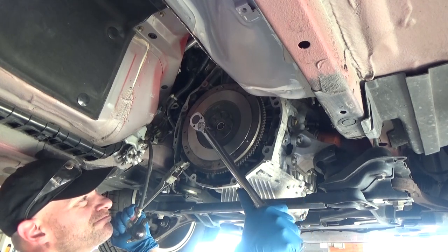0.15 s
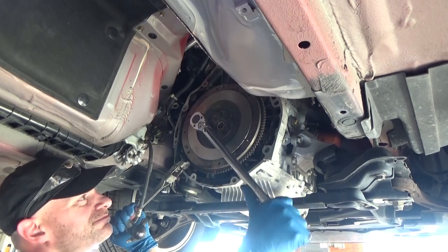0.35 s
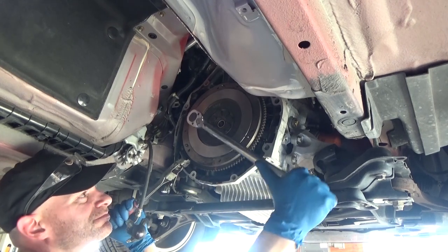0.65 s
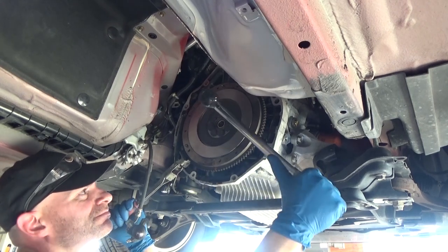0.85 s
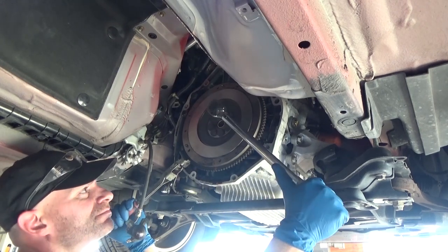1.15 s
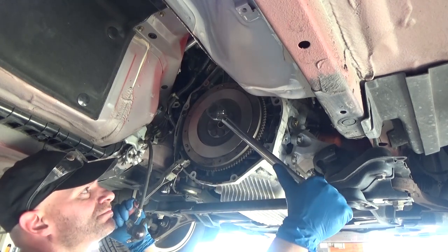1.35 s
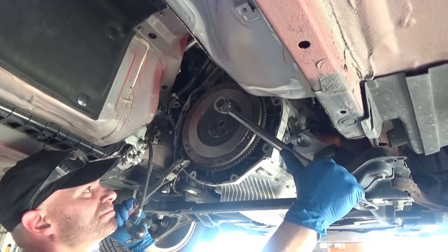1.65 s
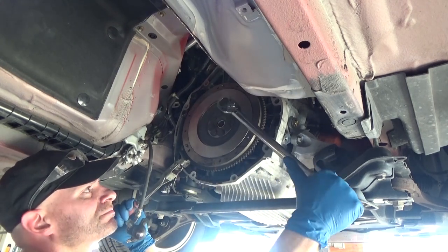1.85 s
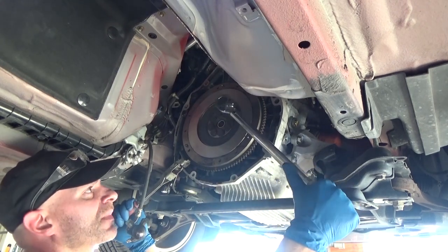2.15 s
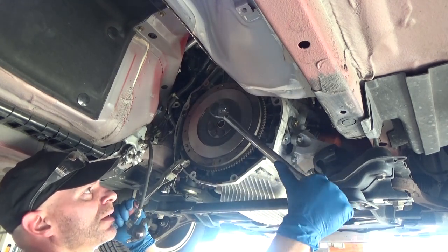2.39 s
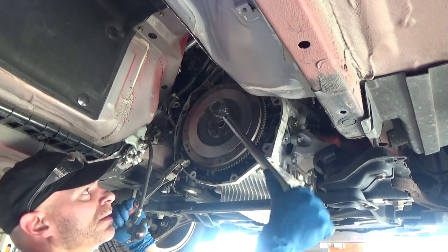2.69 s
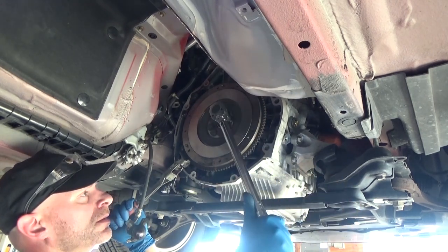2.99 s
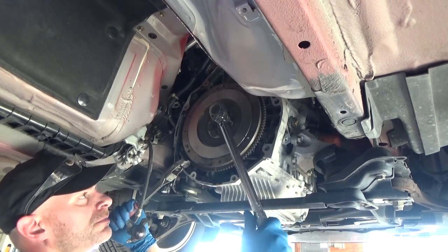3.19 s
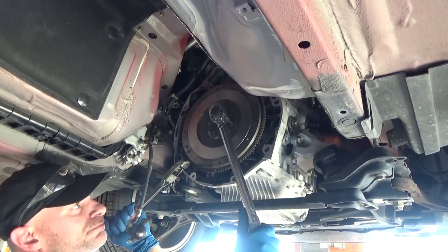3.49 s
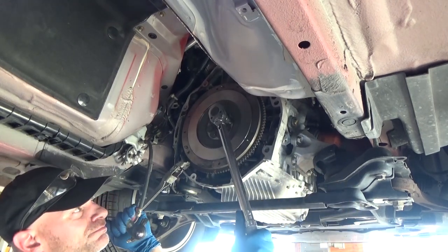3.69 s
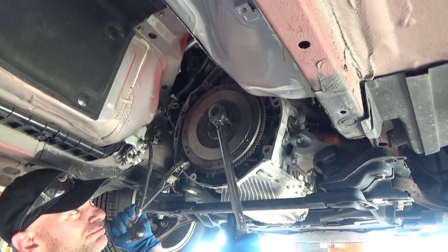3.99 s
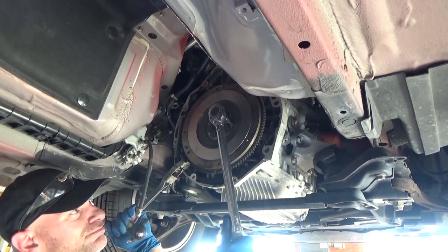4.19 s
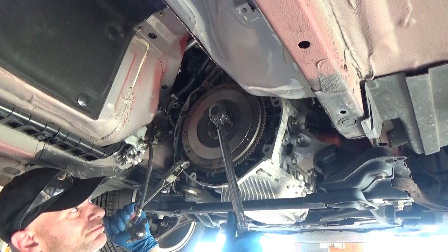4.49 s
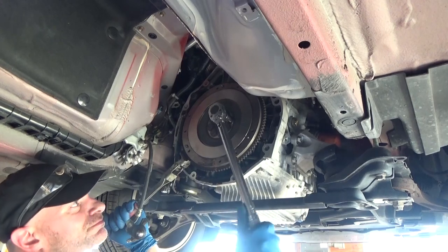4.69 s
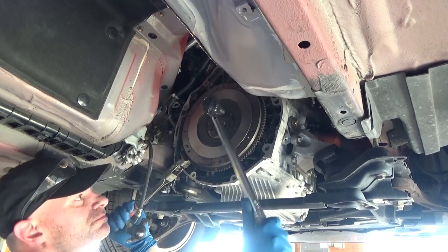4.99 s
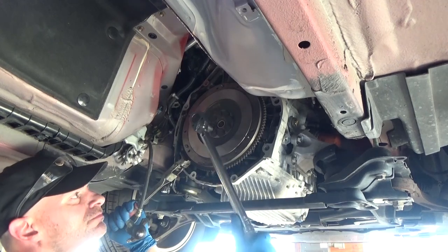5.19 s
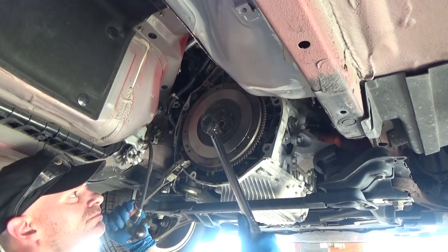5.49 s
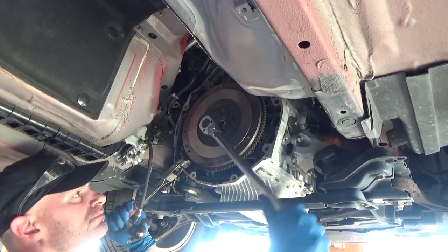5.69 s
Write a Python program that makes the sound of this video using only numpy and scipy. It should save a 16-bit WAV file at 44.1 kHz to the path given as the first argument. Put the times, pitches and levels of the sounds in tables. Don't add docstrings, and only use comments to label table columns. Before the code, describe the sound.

Two hard ratchet-like clicks open the scene, followed by light clinks, short scrapes and metallic knocks as a socket moves between bolts. A lull with only low engine hum and hiss leads to another click and snap, then a softer seating and a drop. The microphone is near, in a reverberant garage, its background dipping briefly at loud blows.

```python
import sys
import numpy as np
from scipy import signal
from scipy.fft import rfft, irfft, next_fast_len
from scipy.io import wavfile

SR = 44100
rng = np.random.default_rng(int(sys.argv[2]) if len(sys.argv) > 2 else 0)


def transcribe(u):
    v = np.clip(np.atleast_2d(u).T, -1, 1)
    q = np.round(v * 32767).astype(np.int16)
    wavfile.write(sys.argv[1], SR, q)


def voltage_ratio(decibels):
    exponent = np.asarray(decibels, float) / 20
    return 10 ** exponent


N = 257984

# [t/s, crack peak level/dB, tail against crack/dB, late share of tail/dB,
# flywheel ring against crack/dB]
PAWL_BREAKS = [
    (0.159, -11, -13, 3, -38),
    (4.2192, -12.5, -8.5, 0.5, -34),
]
PAWL_RETURNS = [
    (0.4005, -10.5, -12, -4, -34),
    (4.4744, -13, -9, -6, -32),
]
SOCKET_SLAPS = [
    (1.134, -14, -8, -1.2, -10),
]
SOCKET_SEATS = [
    (1.743, -12.5, -8, -2.5, -15),
    (5.4321, -17.5, -8, -7.5, -19),
]
SOCKET_KNOCKS = [
    (2.4117, -11.5, -16.5, 0.5, -16.5),
    (2.5291, -19.5, -13.5, -29, -39),
    (2.7846, -12, -15, -1.5, -28),
]
SOCKET_DROPS = [
    (5.676, -12.5, -3, -13, -28),
]
# [f/Hz, width/Hz, level/dB]
KNOCK_COLOUR = [(120, -55), (200, -26), (659, -14.5), (791, 3), (1020, -9.5), (4600, -8.5), (5230, -8.5),
                (5840, -9.5), (6640, -15.5), (12200, -9), (16000, -29)], [(782, 31, 1.5), (2440, 470, -4.5),
                (2800, 60, -9.5), (4600, 150, -1.5), (8750, 87, 0.5), (10790, 140, 0.5), (12300, 100, -17)]
# [f/Hz, level/dB, time to fall 60 dB/s]
SEAT_NOTES = [(810, -1, 0.5), (890, -23, 0.97), (1715, 1, 0.18), (4640, -8, .33), (9394, -2, .4),
              (11010, -2, .3), (11340, -12, .4), (12290, -2, .17), (13100, -13, .27), (13310, -9, 0.33),
              (14020, -16, .3)]
# [f/Hz, side against middle/dB]
RING_WIDTH = [(60, -29), (110, -18), (200, -19), (380, -12), (700, -8), (1290, -7.5), (2380, -8.5),
              (4400, -10.5), (8120, -9), (15000, -23)]


def unit(x):
    return x / np.sqrt(np.mean(x ** 2) + 1e-20)


def along(points, hz):
    f, v = np.transpose(points)
    return np.interp(np.log(hz + 1), np.log(f + 1), v)


def curves(rows):
    s, *columns = np.transpose(rows)
    return [np.interp(np.arange(N) / SR, s, column) for column in columns]


def bump(hz, centre_hz, octaves):
    return np.exp(-.5 * (np.log2((hz + 1) / centre_hz) / octaves) ** 2)


def noise(size, gain, spread):
    fast = next_fast_len(size)
    hz = np.fft.rfftfreq(fast, 1 / SR)
    widths = [hz * 0 + 1, voltage_ratio(along(spread, hz))]
    spectra = rfft(rng.standard_normal((2, fast))) * gain(hz) * widths
    mid, side = irfft(spectra, fast)[:, :size]
    return unit(np.array([mid + side, mid - side]))


def add(out, s, x):
    out[:, round(s * SR):][:, :x.shape[1]] += x


def colour(tone, valley_db, body_db=0):
    broad, peaks = tone
    top_db = max(peak[2] for peak in peaks)

    def gain(hz):
        power = voltage_ratio(2 * (along(broad, hz) + valley_db))
        for centre_hz, width_hz, db in peaks:
            power = power + voltage_ratio(2 * (db - top_db)) / (1 + (2 * (hz - centre_hz) / width_hz) ** 2)
        return np.sqrt(power) * voltage_ratio(body_db * bump(hz, 673, 0.24)) * (hz > 150)

    return gain


def crack(gain, t60):
    t = np.arange(SR // 10) / SR
    return noise(len(t), gain, [(1000, -11), (12000, -22)]) * voltage_ratio(-60 * t / t60) * (1 - np.exp(-t / 0.00033))


def ringing(gain, size, early_t60, late_db):
    # [f/Hz, time to fall 60 dB/s]
    late_t60 = [(300, 2.0), (800, 1.1), (2000, 1.25), (5500, 1.15), (10000, 0.72), (15000, 0.55)]
    hz, t, z = signal.stft(noise(size, gain, RING_WIDTH), SR, nperseg=128)
    early = voltage_ratio(-60 * t / early_t60)
    late = voltage_ratio(late_db - 60 * t / along(late_t60, hz)[:, None])
    sound = signal.istft(z * (early + late), SR, nperseg=128)[1][:, :size]
    return sound * (1 - np.exp(-np.arange(size) / SR / 0.0048))


def modal(modes, t):
    rise_cycles, blur_rad, blur_hz = 1.7, 0.48, 25
    out = 0
    for hz, db, t60 in modes:
        fade = voltage_ratio(db + rng.normal(0, 2.3) - 60 * t / t60) * (1 - np.exp(-t * hz / rise_cycles))
        drift = blur_rad * noise(len(t), lambda f: 1 / (1 + (f / blur_hz) ** 2), [(100, -19)])
        out = out + fade * np.sin(2 * np.pi * hz * t + drift)
    return out


def flywheel(t):
    ring_hz, first_silence_s, weaker_share, t60 = 5711, .115, .8, 0.39
    second_hz = ring_hz + .5 / first_silence_s
    pair = np.sin(2 * np.pi * ring_hz * t) + weaker_share * np.sin(2 * np.pi * second_hz * t)
    return (pair * voltage_ratio(-60 * t / t60) * (1 - np.exp(-(t / 0.0093) ** 2)))[None]


def blows(table, tone, modes, valley_db, modes_db, crack_t60, early_t60, body_db=-0.1):
    out, t = np.zeros((2, N + 2 * SR)), np.arange(65536) / SR
    body = colour(tone, valley_db, body_db)
    bright = lambda hz: body(hz) * voltage_ratio(18.5 * bump(hz, 17800, 1.84))
    for s, db, tail_db, late_db, ring_db in table:
        add(out, s - .001, voltage_ratio(db) * crack(bright, crack_t60))
        add(out, s - .001, voltage_ratio(db + tail_db) * ringing(body, len(t), early_t60, late_db))
        add(out, s, voltage_ratio(db + tail_db + modes_db) * modal(modes, t[:32768]))
        add(out, s, voltage_ratio(db + ring_db + 3.5) * flywheel(t))
    return out[:, :N]


def ticks(table, tone, tail_db, broad, modes_db, note_db):
    # [f/Hz, level/dB, time to fall 60 dB/s]
    socket_notes = [(4700, -8, 0.023), (5710, -7.5, 0.013), (9500, 2, 0.007), (11000, 2.5, 0.0042),
                    (11300, -20, 0.005)]
    out, t = np.zeros((2, N + SR)), np.arange(SR // 10) / SR
    steel = colour(tone, 0)
    for s, db, centre_hz, t60 in table:
        reach = lambda hz: broad + bump(hz, centre_hz, 0.7)
        gain = lambda hz: steel(hz) * reach(hz)
        add(out, s - .001, voltage_ratio(db) * crack(gain, t60))
        add(out, s - .001, voltage_ratio(db + tail_db) * ringing(gain, 16384, .05, -5))
        ring = 0
        for hz, level_db, life in socket_notes:
            fade = voltage_ratio(level_db + rng.normal(0, 1) - 60 * t / life)
            ring = ring + reach(hz) * fade * np.sin(2 * np.pi * (hz * t + rng.random()))
        note = voltage_ratio(note_db - 60 * t / (1.6 * t60)) * np.sin(2 * np.pi * centre_hz * t)
        add(out, s, voltage_ratio(db) * ((voltage_ratio(modes_db) * ring + note) * (1 - np.exp(-t / 0.0014)))[None])
    return out[:, :N]


def engine(rate, course, orders, shares_db):
    wander_hz, steady, side_db = 3.5, 1.6, -14.5
    level_db, = curves(course)
    turn, out = 2 * np.pi * np.cumsum(rate) / SR, 0
    for k, db in zip(orders, shares_db):
        a, b = noise(N, lambda f: 1 / (1 + (f / wander_hz) ** 2), [(100, 0)])
        side = voltage_ratio(side_db) * np.array([b, -b])
        wave = (a + steady + side) * np.cos(k * turn + k * k) + b * np.sin(k * turn + k * k)
        out = out + voltage_ratio(db) * wave / np.sqrt(1 + steady ** 2 / 2)
    return voltage_ratio(level_db) * out


def slowing_engine():
    # [t/s, cycle rate/Hz]
    idle = [(0, 19.1), (1.2, 19.2), (2.3, 19.6), (3.0, 19.6), (3.5, 20.1), (4.0, 19.3), (4.3, 17.4),
            (5.0, 17.3), (5.2, 17.9), (5.45, 17.3), (5.85, 17.3)]
    # [t/s, level/dB]
    first = [(0, -48.5), (.3, -45.5), (.45, -48.5), (.62, -36.5), (.77, -43.5), (.94, -36), (1.11, -43),
             (1.27, -38.5), (1.75, -39.5), (2.2, -45.5), (2.35, -46), (2.6, -44), (2.95, -52.5),
             (3.501, -50.5), (3.899, -57.5), (4.1, -70)]
    second = [(3.8, -65), (4.15, -47), (4.52, -41.5), (4.82, -51.5), (5.0, -45), (5.2, -35), (5.42, -48),
              (5.85, -48)]
    first_orders = (3, 5, 6, 7, 8, 10, 13)
    second_orders = (3, 5, 7, 8, 9, 13)
    first_shares = [-14.5, -5.5, -15, -5, -1.5, -14.5, -18]
    second_shares = [-22, -9, -15, -1, -13, -15]
    rate, = curves(idle)
    return engine(rate, first, first_orders, first_shares) + engine(rate, second, second_orders, second_shares)


def compressor():
    # [t/s, level/dB]
    course = [(0, -72), (2.8, -56), (3.7, -52), (4.3, -54.5), (4.6, -47), (4.85, -53.5), (5.2, -50),
              (5.5, -52), (5.85, -55)]
    shares = [-8, -1.5, -6.5, -11.5]
    return engine(np.full(N, 53.6), course, range(1, 5), shares)


def rumble():
    return voltage_ratio(-57) * noise(N, lambda hz: bump(hz, 58, 0.18) + 0.27 * bump(hz, 28, .3), [(100, -38)])


def air_and_road():
    # [f/Hz, level/dB per Hz]
    hiss = [(280, -43), (480, -13), (540, -3), (756, -12), (1080, -9), (2590, -15), (3180, -13),
            (3600, -18), (5000, -15), (6200, -20), (16000, -25)]
    road = [(40, -32), (80, -3.5), (150, 0), (190, -3.5), (250, -3), (320, -8), (400, -7.5), (470, -16)]
    # [f/Hz, side against middle/dB]
    width = [(60, -37), (110, -24), (200, -18), (380, -4.5), (700, -37), (1290, 0), (2380, -25),
             (4400, -13), (8120, -10), (15000, -18)]
    air = voltage_ratio(-55.5) * noise(N, lambda hz: voltage_ratio(along(hiss, hz)), width)
    return air + voltage_ratio(-53) * noise(N, lambda hz: voltage_ratio(along(road, hz)) * (hz < 520), width)


def ducking():
    t = np.arange(N) / SR
    loud = PAWL_BREAKS + PAWL_RETURNS + SOCKET_SLAPS + SOCKET_SEATS + SOCKET_KNOCKS + SOCKET_DROPS
    return voltage_ratio(-9 * np.max([(t > row[0]) * np.exp(-np.abs(t - row[0]) / 0.021) for row in loud], axis=0))


def pawl_breaks():
    # [f/Hz, width/Hz, level/dB]
    tone = [(120, -55), (200, -23), (709, -6), (933, 6.5), (1080, -25.5), (1940, 0), (2910, -11),
            (4200, -4.5), (4770, -8.5), (7540, -28), (16000, -17)], [(813, 90, 0.5), (2340, 12, -1.5),
            (4240, 67, 2.5), (5200, 36, -17), (5710, 220, -5), (7580, 320, -5.5), (9560, 110, -8.5),
            (10680, 1200, -9), (11960, 190, -6.5), (14300, 300, -16)]
    # [f/Hz, level/dB, time to fall 60 dB/s]
    modes = [(933, 2, 0.73), (1990, -1, 0.63), (4270, -4, 0.5), (5711, -2, 0.21), (7550, -8, .4)]
    return blows(PAWL_BREAKS, tone, modes, valley_db=-8.5, modes_db=-10, crack_t60=0.032, early_t60=0.15,
                 body_db=-12.0)


def pawl_returns():
    # [f/Hz, width/Hz, level/dB]
    tone = [(120, -72), (200, -6), (579, -6), (899, -5), (1400, -4.5), (1740, 2), (3620, -10.5), (4350, 0),
            (6880, -10), (12200, -11.5), (16000, -28.5)], [(895.5, 14, 5.5), (1797, 20, 4),
            (3040, 460, -4.5), (3870, 68, -4.5), (4800, 150, -5), (7740, 35, -1), (8730, 99, -3),
            (10800, 260, -7.5), (11500, 59, -5), (12900, 31, -6)]
    # [f/Hz, level/dB, time to fall 60 dB/s]
    modes = [(905, -5, 0.86), (1740, 2, 1.0), (1990, -9, 0.65), (3010, 2, 1), (4230, -5, 0.4),
             (4540, 3, .4), (8400, 7, 0.34), (12097, 11, .25)]
    return blows(PAWL_RETURNS, tone, modes, valley_db=-11, modes_db=-14.5, crack_t60=0.035, early_t60=0.17)


def socket_clinks():
    # [t/s, peak level/dB, centre f/Hz, time to fall 60 dB/s]
    clinks = [(0.616, -31, 8960, 0.017), (0.634, -32, 10500, .012), (0.6515, -23, 10600, 0.013),
              (0.672, -41, 11000, 0.016), (0.681, -18, 8900, 0.01), (0.697, -14.5, 7640, 0.0057),
              (1.169, -11.5, 12000, 0.0026), (1.458, -28.5, 9800, 0.0037), (1.6255, -19.5, 8970, 0.01),
              (1.636, -20, 6970, 0.015), (1.643, -27.5, 7000, 0.02), (1.718, -21.5, 8900, .025),
              (1.936, -21, 8800, 0.076), (1.988, -29, 9030, 0.018), (2.428, -12.5, 4700, .01),
              (2.4493, -10, 5710, 0.0062), (2.555, -22, 9000, 0.011), (2.7735, -16, 10610, 0.017),
              (2.89, -26, 4700, .02), (2.97, -32.5, 8940, .03), (3.122, -39, 9070, 0.014),
              (4.83, -44, 11000, .015), (5.435, -10.5, 11000, 0.011), (5.534, -21.5, 7180, 0.026),
              (5.541, -21, 11500, 0.029), (5.557, -23.5, 5890, 0.02), (5.667, -15, 9900, 0.015),
              (5.749, -25.5, 9730, 0.025)]
    return ticks(clinks, KNOCK_COLOUR, tail_db=-19.5, broad=0.57, modes_db=0.5, note_db=-22)


def dull_bumps():
    # [t/s, peak level/dB, centre f/Hz, time to fall 60 dB/s]
    bumps = [(0.6197, -42, 1670, 0.023), (0.6505, -14.5, 2100, 0.004), (0.696, -29, 606, 0.045),
             (.697, -37, 280, 0.1), (.681, -33, 4700, 0.017), (.700, -15.5, 1350, 0.009),
             (.716, -28.5, 1440, 0.027), (1.571, -32, 2070, 0.042), (1.585, -35, 3000, .03),
             (1.602, -32.5, 1760, 0.084), (1.626, -20.5, 2690, 0.011), (1.6355, -28.5, 2340, 0.055),
             (1.643, -32, 1650, 0.054), (1.94, -33.5, 1990, 0.059), (1.989, -32.5, 2200, 0.047),
             (2.037, -32.5, 850, 0.057), (2.26, -47.5, 2860, 0.097), (2.31, -46, 2930, 0.068),
             (2.531, -18.5, 2770, 0.029), (2.891, -29.5, 1490, 0.03), (2.9584, -37, 1268, 0.092),
             (2.9666, -32, 1256, 0.074), (5.611, -28, 1750, 0.033),
             (2.342, -42, 1630, .04),
        (3.1875, -41, 2340, .015),
        (4.8333, -39, 2200, .02),
        (4.861, -36, 2800, .012),
    ]
    # [f/Hz, width/Hz, level/dB]
    tone = ([(150, -52), (300, 5), (800, -4), (3000, -7), (6000, -12), (16000, -7)], [(720, 52.3, 0)])
    return ticks(bumps, tone, tail_db=-19, broad=0.07, modes_db=-2, note_db=-1)


def socket_slaps():
    # [f/Hz, width/Hz, level/dB]
    tone = [(120, -44), (200, -14), (600, -14), (900, 5), (1300, -7.5), (2500, -7.5), (5600, -3),
            (6600, -13), (10000, -10), (10800, 3), (14000, -4), (16000, -18)], [(800, 19, 3),
            (1760, 60, -1), (2490, 200, -7), (4650, 150, -13), (11200, 400, -6), (12300, 200, -10),
            (13200, 300, -9)]
    return blows(SOCKET_SLAPS, tone, SEAT_NOTES, valley_db=-10.5, modes_db=-10.0, crack_t60=0.026, early_t60=0.092)


def scrape():
    # [t/s, length/s, body level/dB, hiss level/dB]
    drags = [
        (1.396, 0.082, -40.5, -60),
        (1.545, 0.12, -34, -51),
        (1.671, 0.047, -28.5, -60),
        (3.16, 0.034, -59, -43.5),
    ]
    rise_s, fall_s = 0.027, 0.028
    out, t = np.zeros((2, N)), np.arange(N) / SR

    def panel(hz):
        low = 1 / (1 + ((hz - 787) / 25) ** 2) + 0.5 / (1 + ((hz - 900) / 60) ** 2)
        return low + 0.11 * bump(hz, 1900, 0.79)

    for s, length, body_db, hiss_db in drags:
        on = np.clip((t - s) / rise_s, 0, 1) * np.exp(-np.clip(t - s - length, 0, None) / fall_s)
        out += on * voltage_ratio(body_db) * noise(N, panel, RING_WIDTH)
        out += on * voltage_ratio(hiss_db) * noise(N, lambda hz: bump(hz, 13700, 0.97), RING_WIDTH)
    return out


def socket_seats():
    # [f/Hz, width/Hz, level/dB]
    tone = [(120, -42), (200, -22), (579, -8), (933, -3), (1300, -3), (1740, -3.5), (5330, -5.5), (5630, 1),
            (6640, -11.5), (11300, -0.5), (16000, -24.5)], [(780, 58, -10.5), (930, 40, -6.5),
            (1667, 100, -12), (2590, 350, -18), (4740, 210, -26), (11000, 82, -23.5), (10800, 110, -22),
            (12000, 54, -15)]
    return blows(SOCKET_SEATS, tone, SEAT_NOTES, valley_db=-10.5, modes_db=-9.0, crack_t60=0.076, early_t60=0.082)


def pings():
    # [t/s, level/dB]
    taps = [
        (1.941, -38),
        (5.541, -58),
    ]
    out = np.zeros((2, N + SR))
    for s, db in taps:
        add(out, s, voltage_ratio(db) * flywheel(np.arange(SR // 2) / SR))
    return out[:, :N]


def socket_knocks():
    # [f/Hz, level/dB, time to fall 60 dB/s]
    modes = [(788, 15, 0.27), (1512, 8.5, .15), (2280, 5, .4), (2830, 4.5, 0.65), (3350, 4, 0.29),
             (4670, 5, 0.6), (4700, 1, .4), (8600, 14.5, 0.15), (9700, 9, .5), (10770, 0, .25),
             (11320, 3, .12), (12290, -4, 0.32)]
    return blows(SOCKET_KNOCKS, KNOCK_COLOUR, modes, valley_db=-1.5, modes_db=-14.5, crack_t60=0.04, early_t60=0.22)


def socket_drops():
    # [f/Hz, width/Hz, level/dB]
    tone = [(120, -45), (200, -15), (387, -39), (763, 2.5), (1210, -8), (1500, 0), (3430, -4), (5730, -0.5),
            (6400, -13), (9400, -2), (16000, -12.5)], [(790, 27, 6), (1710, 42, 8.5), (2600, 110, 8.5),
            (5100, 68, -4), (5710, 55, -11), (9200, 34, -2), (11000, 160, 5.5), (13200, 32, -10)]
    # [f/Hz, level/dB, time to fall 60 dB/s]
    modes = [(785, -3, 0.15), (1780, -24, 0.29), (9450, 6, 0.13), (11600, 1, 0.22)]
    return blows(SOCKET_DROPS, tone, modes, valley_db=-7, modes_db=-14.0, crack_t60=0.027, early_t60=0.094)


def scene():
    background = slowing_engine() + compressor() + rumble() + air_and_road()
    wrench = pawl_breaks() + pawl_returns()
    socket = socket_slaps() + socket_seats() + socket_knocks() + socket_drops()
    small = socket_clinks() + dull_bumps() + scrape() + pings()
    return ducking() * background + wrench + socket + small


def roll_off(x):
    return signal.sosfilt(signal.butter(12, 16970, fs=SR, output="sos"), x)


def record(dry):
    hz = np.fft.rfftfreq(N, 1 / SR)
    mix = irfft(rfft(dry) * np.where(hz < 15850, 1, voltage_ratio(-29)), N)
    return roll_off(mix)


dry = scene()
out = record(dry)
transcribe(out)
```